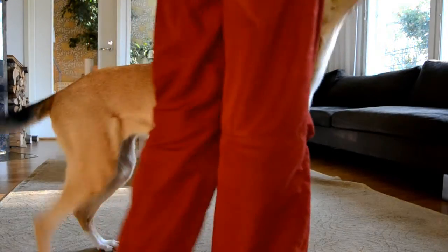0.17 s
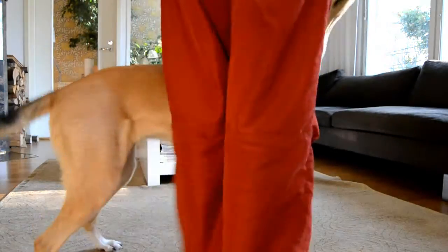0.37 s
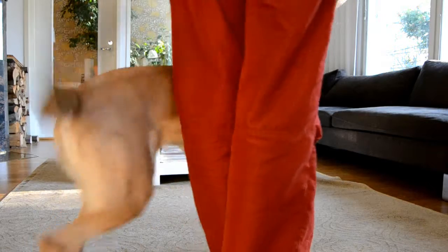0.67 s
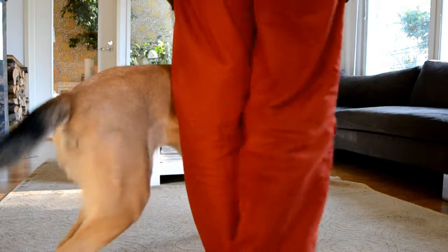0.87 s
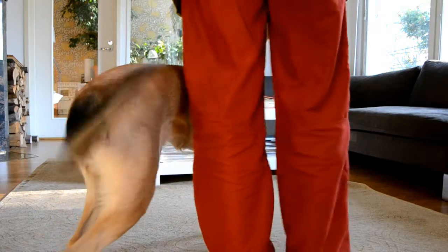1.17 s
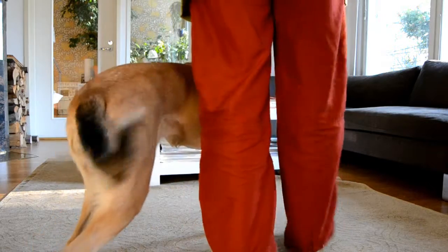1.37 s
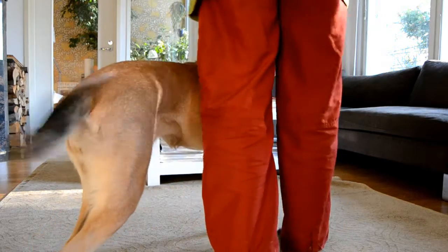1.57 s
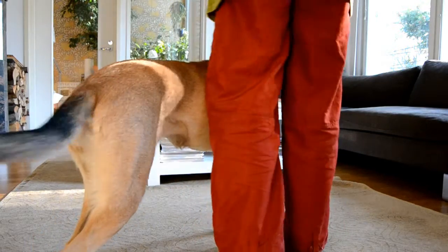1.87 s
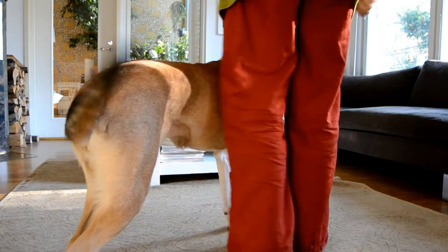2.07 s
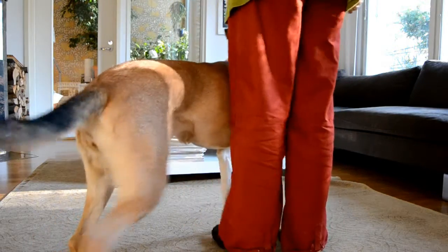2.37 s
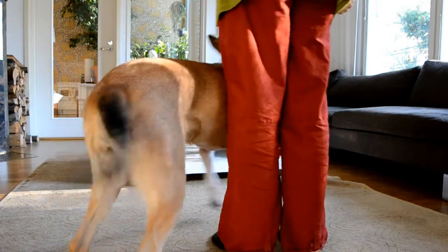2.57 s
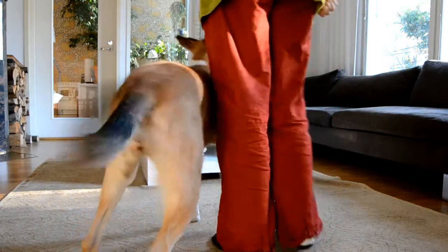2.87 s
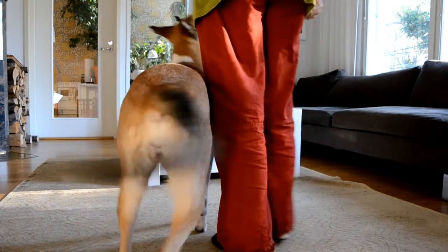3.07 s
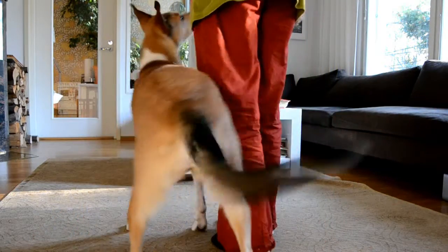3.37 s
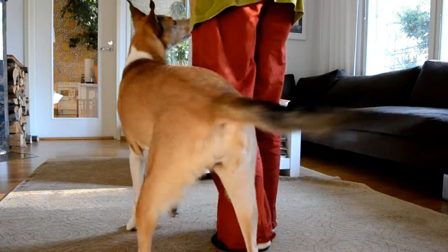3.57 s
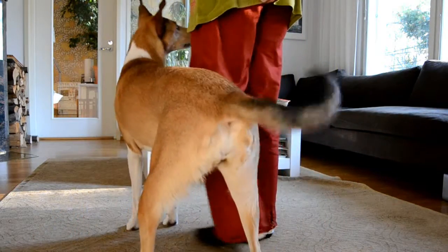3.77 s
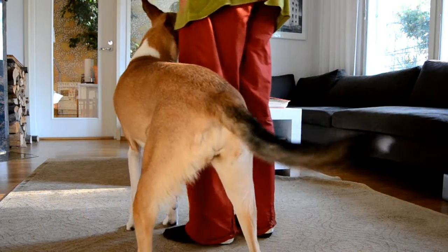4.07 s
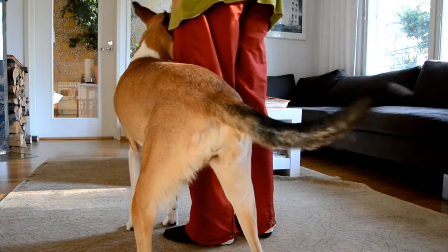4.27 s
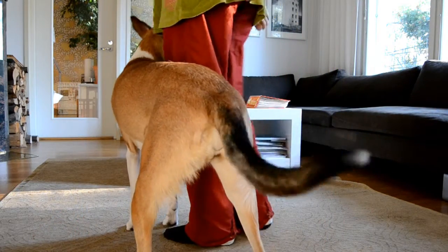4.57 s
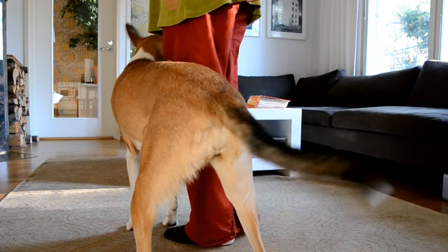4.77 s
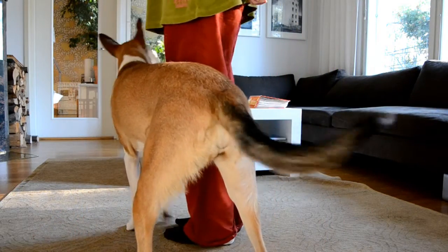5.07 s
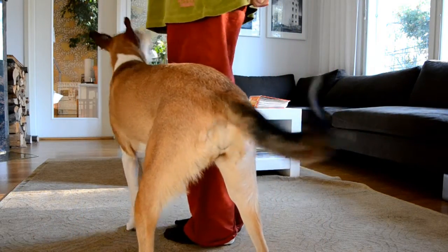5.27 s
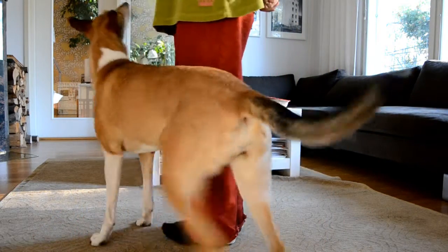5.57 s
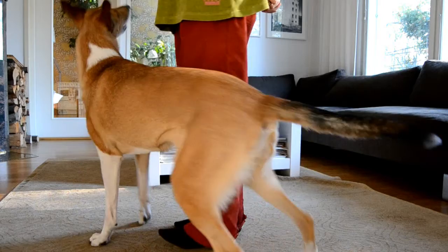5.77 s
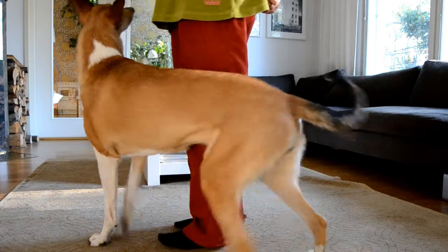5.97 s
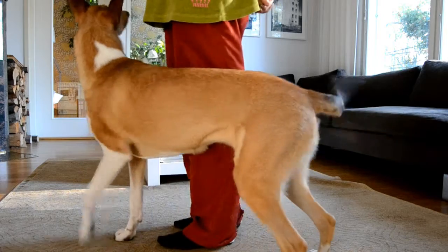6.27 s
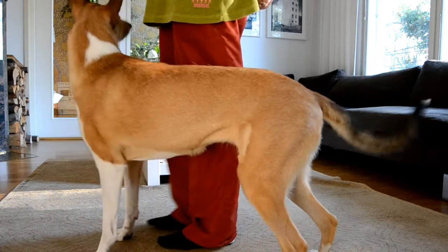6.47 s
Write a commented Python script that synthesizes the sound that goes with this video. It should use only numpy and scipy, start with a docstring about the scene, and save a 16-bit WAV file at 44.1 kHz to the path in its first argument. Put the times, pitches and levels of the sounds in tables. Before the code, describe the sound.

A handheld training clicker snaps sharply in pairs in a quiet living room, over a dog's faint steps and rustling cloth.

```python
"""A dog-training clicker, pressed and let go close to one microphone in a quiet living room.
Its steel tongue buckles with one ring and springs back with another; each snap overloads the
microphone for a millisecond and then fills the room. Farther off, a dog steps about on the rug
and brushes against its trainer's trousers. Still air and a faint appliance hum lie underneath."""
import sys
import numpy as np
from scipy import signal
from scipy.fft import rfft, irfft
from scipy.io import wavfile

SR = 44100
rng = np.random.default_rng(int(sys.argv[2]) if len(sys.argv) > 2 else 0)


def generate_wav(sig):
    """Save sig (samples, or channels by samples) to the path in sys.argv[1] as 16-bit PCM at SR."""
    pcm = np.round(np.clip(np.atleast_2d(sig).T, -1, 1) * 32767).astype(np.int16)
    wavfile.write(sys.argv[1], SR, pcm)


N = 292659
TIME = np.arange(N) / SR


def clicker():
    """The steel tongue buckles and springs back, ringing differently each way: (direct, sent to room)."""
    # tongue buckles: (time [s], strength [dB], direct path [dB], tilt [dB/octave], pop [dB], pop [Hz])
    presses = [(1.1398, 3.5, -3, -1.5, 8, 352), (3.5926, 3.5, -2, -2, -3, 820),
               (6.4414, 3, -7, -0.8, -11, 590)]
    # tongue springs back: same columns
    releases = [(1.3131, 4.5, -1, 0, 4.5, 700), (3.7753, 5, -3.5, -0.2, 2.5, 189)]
    # tongue and case while buckled: (frequency [Hz], width [Hz], level [dB])
    press_modes = [(1880, 300, -16.5), (3070, 400, -17.5), (3760, 130, -1), (4830, 740, -11),
                   (5160, 220, -6.5), (7150, 380, .5), (8300, 200, -6), (8640, 590, -11.5),
                   (9640, 760, -22), (10600, 350, -28)]
    # tongue and case at rest: (frequency [Hz], width [Hz], level [dB])
    release_modes = [(2100, 260, -3.5), (2760, 450, -8), (3540, 800, -6), (4150, 250, -1), (5260, 350, 0),
                     (6390, 270, -2.7), (7220, 530, -8), (8200, 370, -9), (8880, 1430, -10.6),
                     (10360, 520, -15)]
    return snaps(presses, press_modes, pop_width=1.9) + snaps(releases, release_modes, pop_width=1.4)


def snaps(events, modes, pop_width):
    """The case beams each ring at the microphone, then recoils with a dull pop too weak to carry."""
    direct, sent = np.zeros((2, N))
    blow = signal.unit_impulse(SR // 20)
    case = signal.butter(6, 1760, "high", fs=SR, output="sos")   # a small case radiates little bass
    beam = signal.butter(1, 4600, "high", fs=SR, output="sos")   # only the treble is beamed
    leak_db, recoil_s = -22, .0011
    for time, db, direct_db, tilt_db, pop_db, pop_hz in events:
        ring = from_db(db) * strike(blow, modes, tilt_db, vary_db=0.97)
        snap = signal.sosfilt(case, ring) + from_db(leak_db) * ring
        add(sent, time, snap)
        add(direct, time, from_db(direct_db) * signal.sosfilt(beam, snap))
        add(direct, time + recoil_s, from_db(pop_db) * resonate(blow, pop_hz, pop_width * pop_hz))
    return np.array([direct, sent])


def strike(blow, modes, tilt_db, vary_db):
    """A blow sets all modes ringing, neighbours in opposite sense; peak 1."""
    ring = 0
    for k, (hz, width, db) in enumerate(modes):
        gain = from_db(db + tilt_db * np.log2(hz) + vary_db * rng.standard_normal())
        ring = ring + (-1) ** k * gain * resonate(blow, hz, width)
    return ring / np.abs(ring).max()


def paw_steps():
    """Each soft contact is a short scratch through one broad resonance."""
    # paws, claws, small knocks and two sharp fabric ticks: (time [s], peak level [dB], centre [Hz], decay [s])
    taps = [(.686, -43.5, 2960, 0.03), (1.017, -53.5, 900, .06), (1.052, -59, 1000, 0.042),
            (1.685, -43.5, 3130, 0.018), (2.662, -45.5, 2980, 0.056), (3.212, -47, 1200, .04),
            (3.253, -46, 5500, .02), (3.271, -46, 5000, .015), (3.481, -40.5, 1200, 0.017),
            (4.186, -47.5, 3450, 0.033), (4.311, -45, 3600, 0.14), (4.807, -45, 2930, 0.024),
            (4.942, -44, 3400, 0.019), (5.587, -42, 3200, 0.035), (5.917, -47, 1300, 0.058),
            (6.218, -48.5, 927, 0.089)]
    track = np.zeros(N)
    for time, db, hz, t60 in taps:
        tap = resonate(scratch(t60), hz, width=0.35 * hz)
        add(track, time, from_db(db) * tap / np.abs(tap).max())
    return track


def clack():
    """One sharper, scratchy clack: quick rough contacts on a small hard body."""
    # the contacts: (time [s], level [dB], decay [s])
    contacts = [(6.2879, -38.5, 0.11), (6.2963, -31, 0.0076), (6.299, -23.5, 0.013), (6.309, -45, 0.1)]
    # the body's ring: (frequency [Hz], width [Hz], level [dB])
    modes = [(900, 690, -5.5), (1200, 240, 1.5), (1850, 430, -3.5), (2640, 370, 2), (4100, 1700, -9),
             (5740, 2500, -18), (9200, 900, -22)]
    track = np.zeros(N)
    for time, db, t60 in contacts:
        add(track, time, from_db(db) * strike(scratch(t60), modes, tilt_db=0, vary_db=2.0))
    return signal.sosfilt(signal.butter(2, 270, "high", fs=SR, output="sos"), track)


def scratch(t60):
    """The dying noise of a rough contact."""
    t = TIME[:SR // 5]
    return rng.standard_normal(len(t)) * np.exp(-np.log(1000) * t / t60)


def trouser_rub():
    """Fibres catch and slip: a dull body and a grainy hiss follow each stroke, over a light rustle."""
    # the dog brushes along the trousers: (start [s], length [s], body [dB], hiss [dB])
    strokes = [(0, 0.069, -67, -63), (0.124, 0.26, -65.5, -58), (.22, 0.73, -63.5, -62),
               (0.658, 0.61, -63, -61.5), (1.003, 0.091, -60.5, -66), (1.66, 0.21, -73, -61),
               (1.866, 0.14, -78.5, -57), (2.156, .13, -66.5, -62), (2.24, 0.74, -70.5, -62),
               (2.451, 0.08, -67, -57), (2.517, 0.083, -59.5, -62.5), (2.77, 0.14, -66.5, -65),
               (3.051, 0.087, -72, -65), (3.151, 0.11, -59, -63), (3.22, 0.13, -65.5, -57.5),
               (3.393, 0.26, -62, -64), (4.16, 0.11, -73, -62), (4.413, 0.17, -81, -64),
               (4.926, 0.14, -80, -65.5), (5.552, 0.25, -69, -74), (5.713, 0.17, -62, -69),
               (5.91, .07, -56, -59), (5.97, .15, -65, -65), (6.098, 0.18, -67, -63)]
    # the cloth's dull body: (frequency [Hz], relative level [dB])
    body_colour = [(150, -13), (400, -2), (900, 2.5), (1600, -1.5), (2800, -7), (5000, -28)]
    # the fibres' hiss: (frequency [Hz], relative level [dB])
    hiss_colour = [(1200, -23.5), (2800, 0.5), (5000, -3), (7000, -5.5), (7900, -9), (9000, -2),
                   (10500, -12), (12000, -17)]
    restless = from_db(2.5 * flutter(4.2))   # the rustle wanders but never stops
    body_power = (restless * from_db(-71)) ** 2
    hiss_power = (restless * from_db(-68)) ** 2
    for start, length, body_db, hiss_db in strokes:
        fastest = start + 0.34 * length   # a stroke picks up quickly and slows to rest
        speed = np.sin(np.interp(TIME, [start, fastest, start + length], [0, np.pi / 2, np.pi]))
        body_power += (from_db(body_db) * speed) ** 2
        hiss_power += (from_db(hiss_db) * speed) ** 2
    grain = rms_one(from_db(1.5 * flutter(130)))
    return grain * (np.sqrt(body_power) * noise(body_colour) + np.sqrt(hiss_power) * noise(hiss_colour))


def swish():
    """One soft, dull rush that swells, holds and fades."""
    # spectrum of the rush: (frequency [Hz], relative level [dB])
    colour = [(88, -65), (150, -34.5), (350, -11), (457, -17.5), (514, -3.5), (607, -7.5), (875, -1.5),
              (1730, -8.5), (3200, -17), (5280, -25), (8000, -18.5), (10400, -39), (17600, -120)]
    start_s, attack_s, hold_s = 4.208, .035, .06
    level_db, fade_db_per_s, grain_db = -49, 105, 0.2
    age = TIME - start_s
    swell = np.clip(age / attack_s, 0, 1)
    fade_db = fade_db_per_s * np.maximum(age - attack_s - hold_s, 0)
    return swell * from_db(level_db - fade_db + grain_db * flutter(82)) * noise(colour)


def living_room():
    """The room's response: a few wall echoes and a diffuse tail that builds up and dies band by band."""
    # reverberation time: (frequency [Hz], 60 dB decay [s])
    decays = [(200, 0.46), (1500, .47), (4000, 0.5), (7000, 0.45), (10500, 0.39)]
    # nearest walls and ceiling: (delay [s], level [dB])
    echoes = [(.0088, -30), (0.0116, -29), (0.025, -28), (.0415, -28.5)]
    tail_db, gap_s, build_s, early_share = -11, .002, 0.056, 0.59
    t, hz = TIME[:SR], np.fft.rfftfreq(SR, 1 / SR)
    white = rfft(rng.standard_normal(SR))
    tail = np.zeros(SR)
    for centre, t60 in decays:
        band = at_hz([(f, f == centre) for f, _ in decays], hz)
        tail += irfft(white * band, SR) * np.exp(-np.log(1000) * t / t60)
    tail *= (early_share + (1 - early_share) * np.minimum(t / build_s, 1)) * (t > gap_s)
    response = from_db(tail_db) * tail / np.sqrt(np.sum(tail ** 2))
    for delay, db in echoes:
        add(response, delay, from_db([db]))
    return response


def room_tone():
    """Still air and a faint, wavering appliance hum."""
    # the room's air: (frequency [Hz], relative level [dB])
    air = [(15, -61), (25, -18.5), (134, -6.5), (296, -3), (336, -5), (391, -2.5), (840, -1), (1470, -7),
           (2710, -3.5), (3160, -8), (7130, -14.5), (7900, -17), (8970, -10), (10200, -12), (11000, -21.5),
           (14300, -37), (22000, -120)]
    # appliance tones: (frequency [Hz], level [dB])
    tones = [(343, -79.5), (824, -86.5)]
    hum = 0
    for hz, db in tones:
        phase = 2 * np.pi * hz * TIME + 0.81 * flutter(3)
        hum = hum + np.sqrt(2) * from_db(db) * np.sin(phase)
    return from_db(-63.5) * noise(air) + hum


def noise(spectrum):
    """Steady noise of a given colour, falling away beyond its ends; rms 1."""
    hz = np.fft.rfftfreq(N, 1 / SR)
    ends = np.minimum(1, hz / spectrum[0][0]) / np.maximum(1, hz / spectrum[-1][0]) ** 2
    white = rfft(rng.standard_normal(N))
    return rms_one(irfft(white * from_db(at_hz(spectrum, hz)) * ends, N))


def flutter(rate_hz):
    """Smooth random wavering; rms 1."""
    smooth = signal.butter(2, rate_hz, fs=SR, output="sos")
    return rms_one(signal.sosfilt(smooth, rng.standard_normal(N)))


def resonate(x, hz, width):
    """A two-pole resonance with gain 1 on top."""
    r = np.exp(-np.pi * width / SR)
    poles = [1, -2 * r * np.cos(2 * np.pi * hz / SR), r * r]
    return signal.lfilter(np.array([1, 0, -1]) * (1 - r * r) / 2, poles, x)


def from_db(db):
    """Decibels to gain."""
    return 10 ** (np.asarray(db) / 20)


def rms_one(x):
    """Scale to unit rms."""
    return x / np.sqrt(np.mean(x ** 2) + 1e-20)


def at_hz(points, hz):
    """Read a table on a log-frequency axis."""
    f, value = np.transpose(points)
    return np.interp(np.log(np.maximum(hz, 1)), np.log(f), value)


def add(track, time, sound):
    """Mix a sound into a track at a time in seconds."""
    i = int(round(time * SR))
    track[i:i + len(sound)] += sound[:N - i]


def scene():
    """At the microphone: the clicker close by, the steps and clack farther off with more room on them."""
    clicks, clicks_sent = clicker()
    steps, knock = paw_steps(), clack()
    sent = clicks_sent + from_db(8) * steps + from_db(9.5) * knock
    reverberation = signal.fftconvolve(sent, living_room())[:N]
    background = trouser_rub() + swish() + room_tone()
    return (clicks + steps + knock + reverberation + background)[None]


def record(dry):
    """The microphone overloads unevenly, its treble ends steeply, and the remaining peaks are clipped."""
    mic_top_hz, cutoff_hz, ceiling = 11000, 16000, .52
    headroom = np.where(dry > 0, .68, .71)
    overloaded = headroom * np.tanh(dry / headroom)
    heard = signal.sosfilt(signal.butter(30, mic_top_hz, fs=SR, output="sos"), overloaded)
    clipped = np.clip(heard, -ceiling, ceiling)
    return signal.sosfilt(signal.butter(24, cutoff_hz, fs=SR, output="sos"), clipped)


dry = scene()
out = record(dry)
generate_wav(out)
```